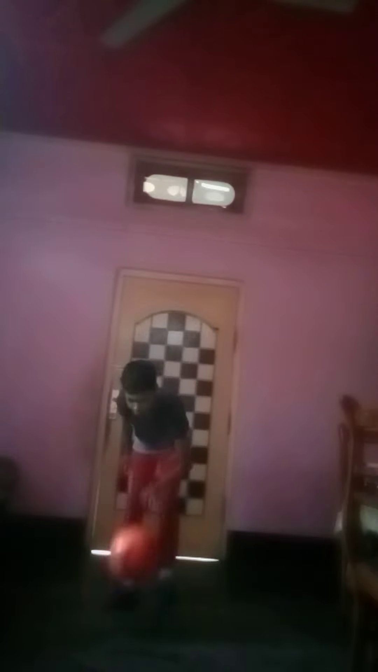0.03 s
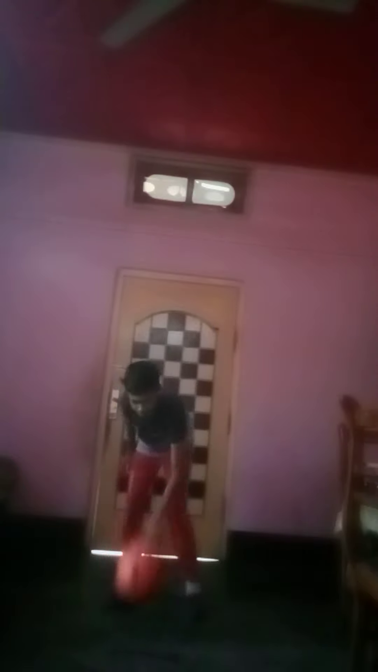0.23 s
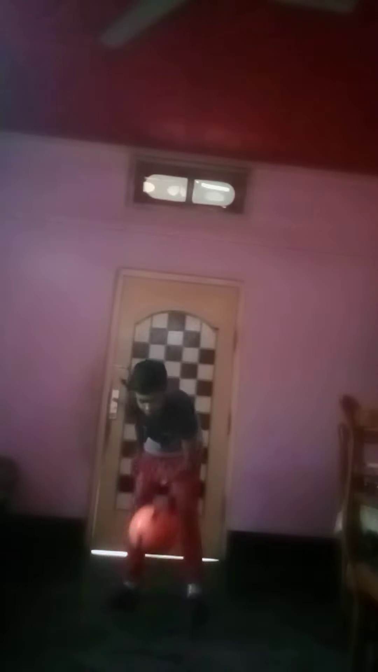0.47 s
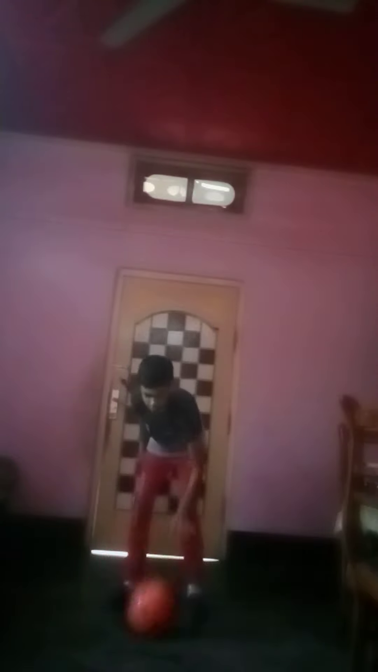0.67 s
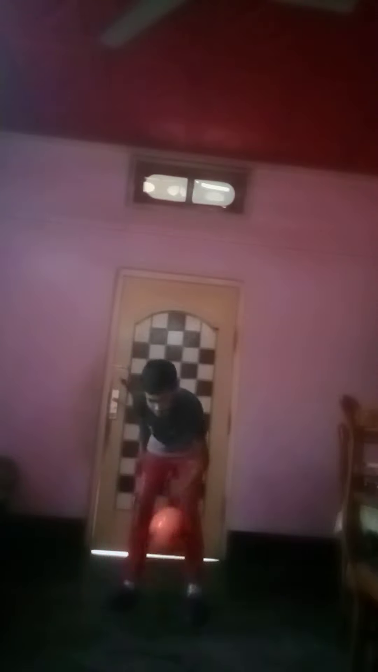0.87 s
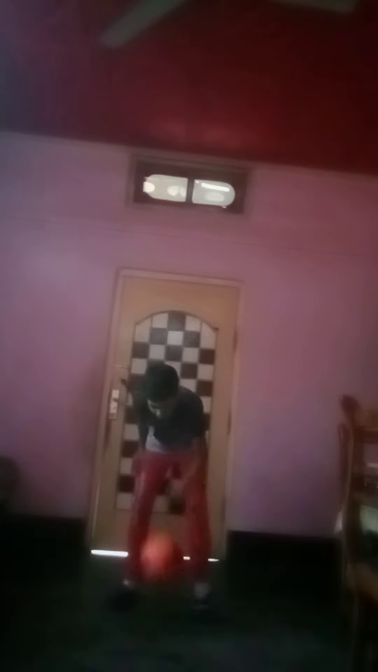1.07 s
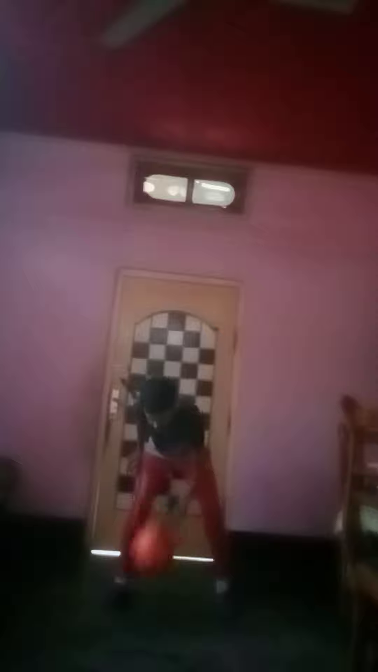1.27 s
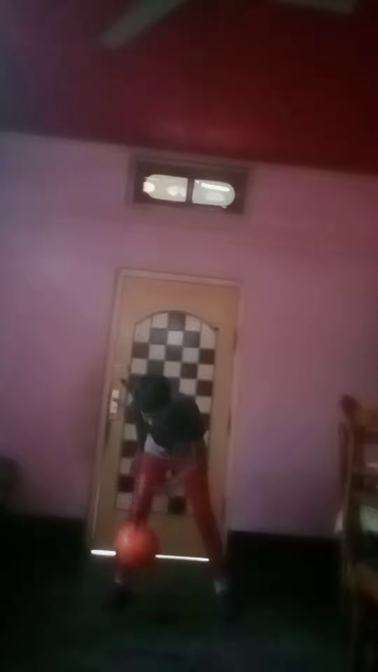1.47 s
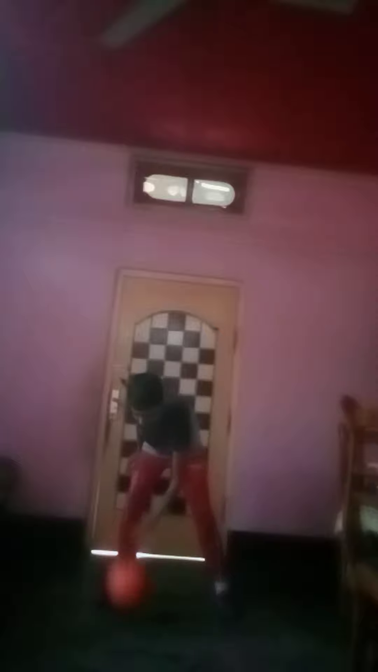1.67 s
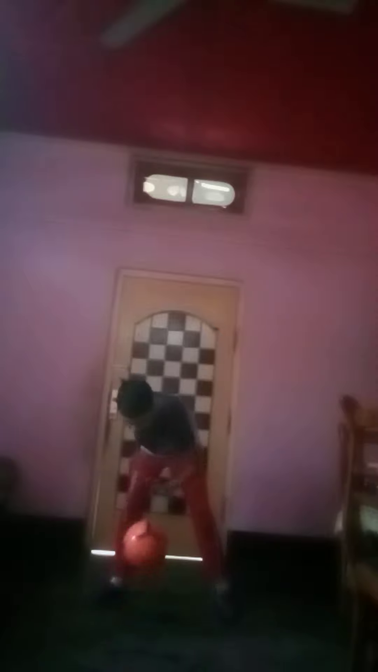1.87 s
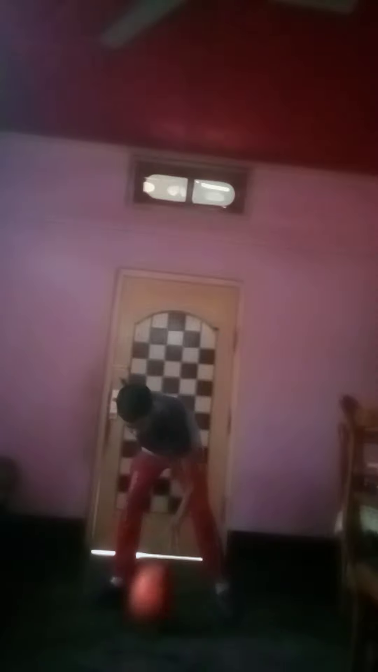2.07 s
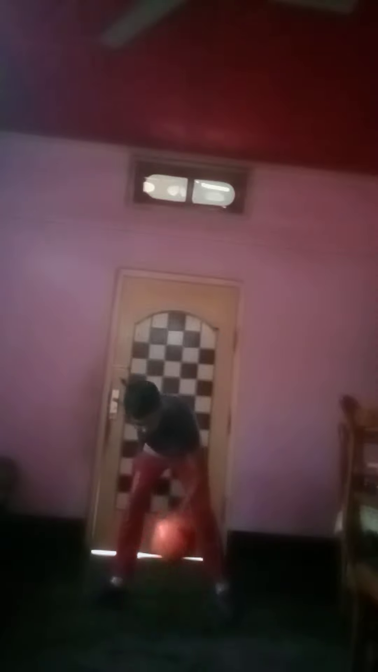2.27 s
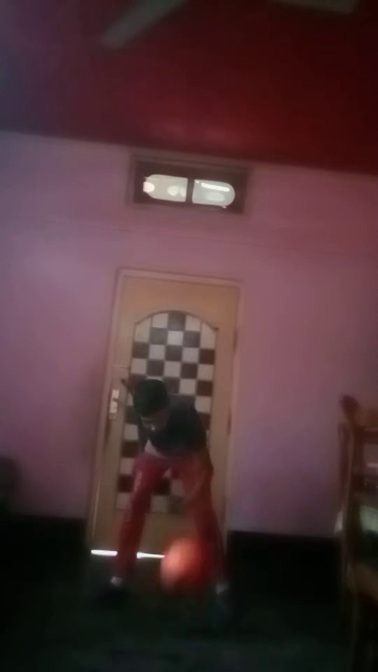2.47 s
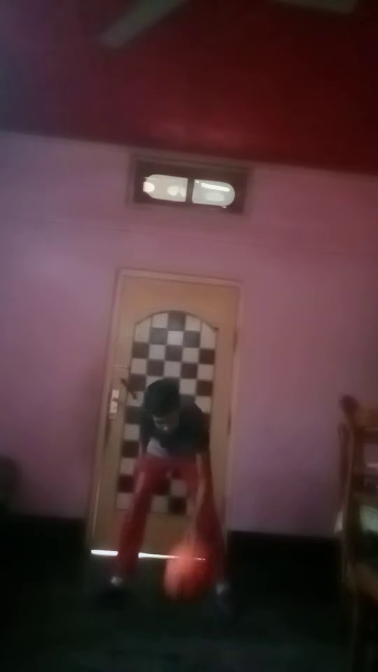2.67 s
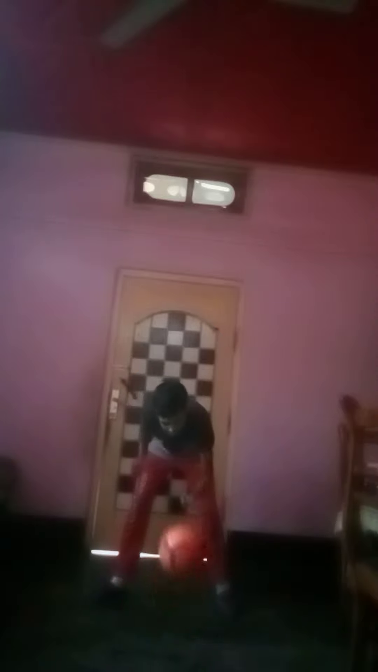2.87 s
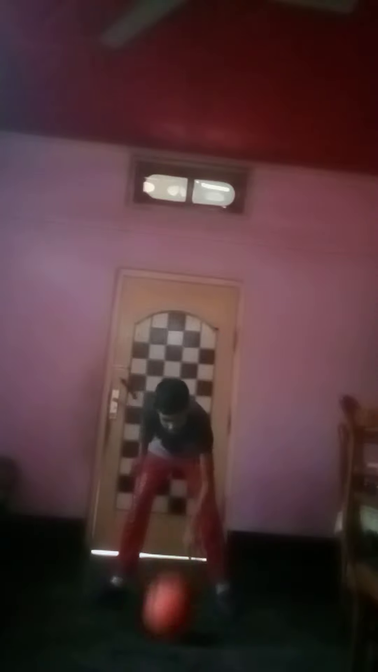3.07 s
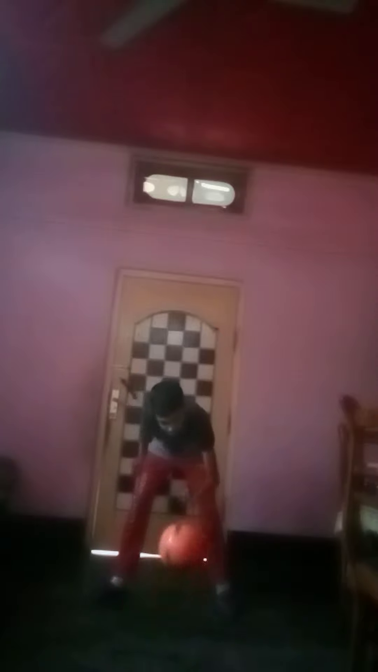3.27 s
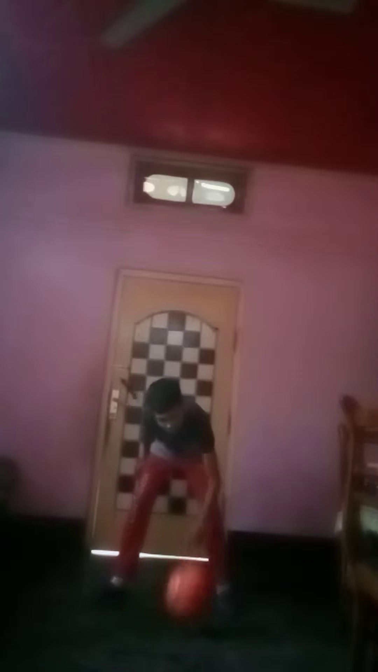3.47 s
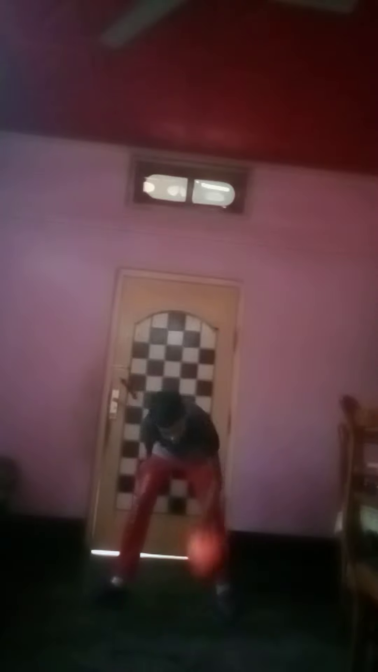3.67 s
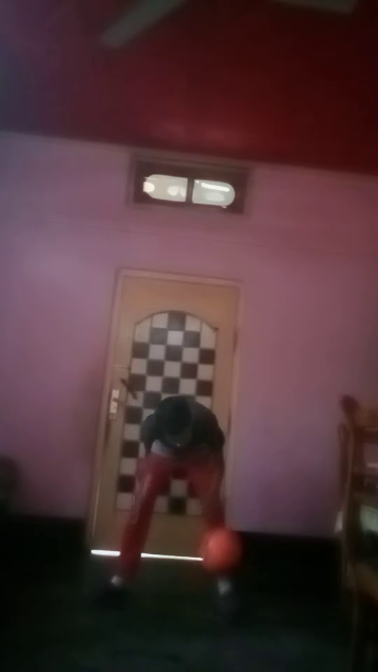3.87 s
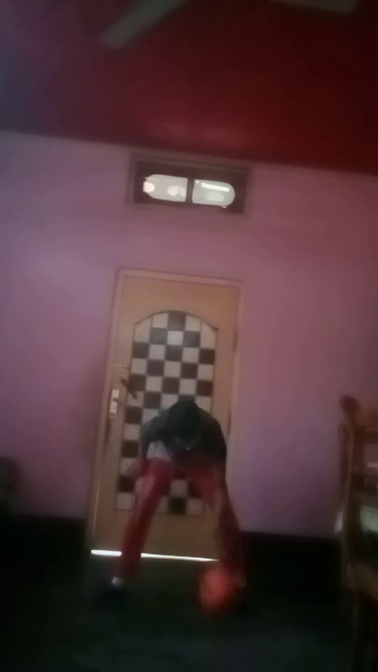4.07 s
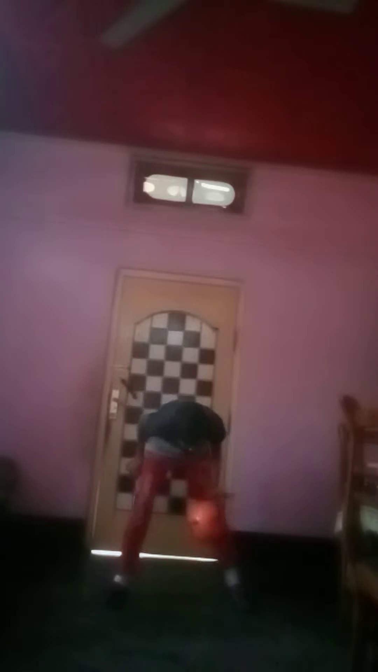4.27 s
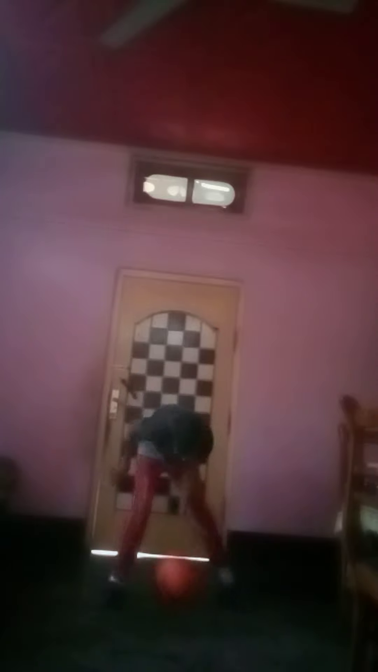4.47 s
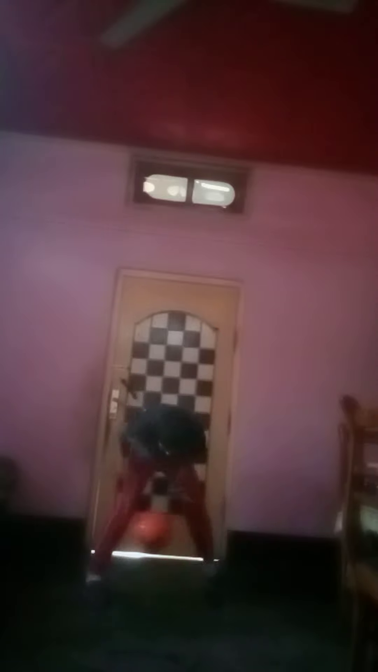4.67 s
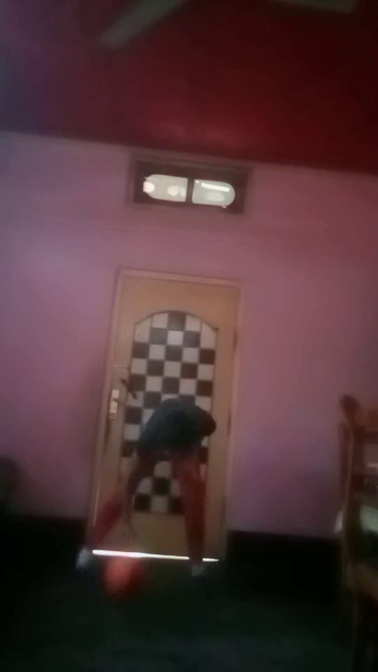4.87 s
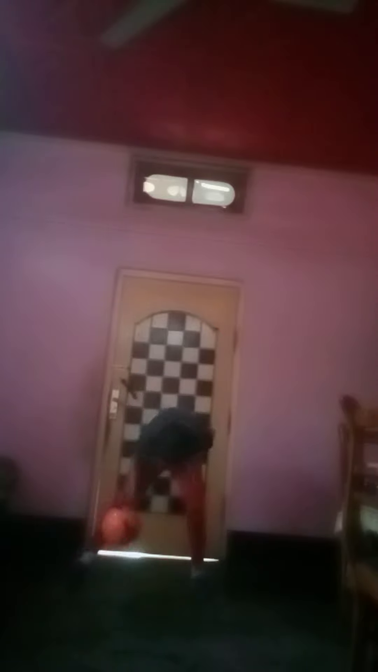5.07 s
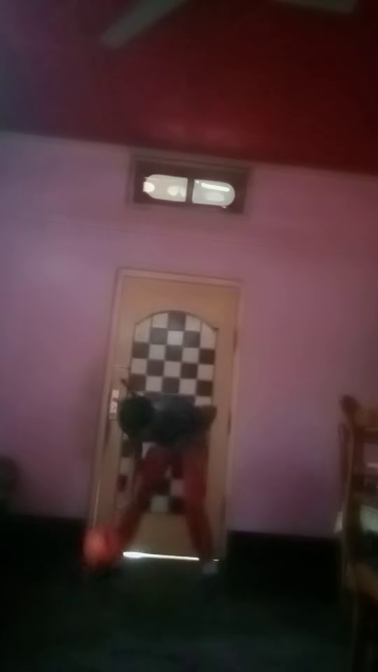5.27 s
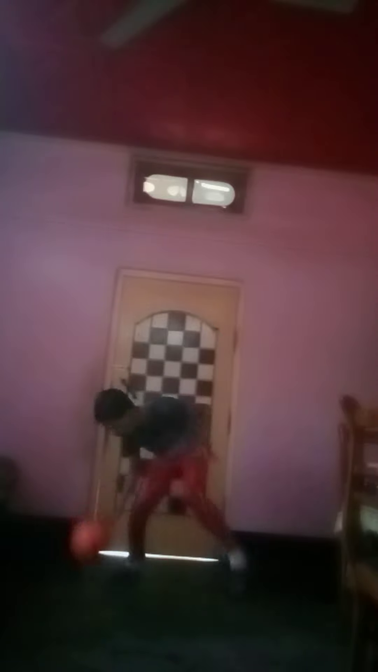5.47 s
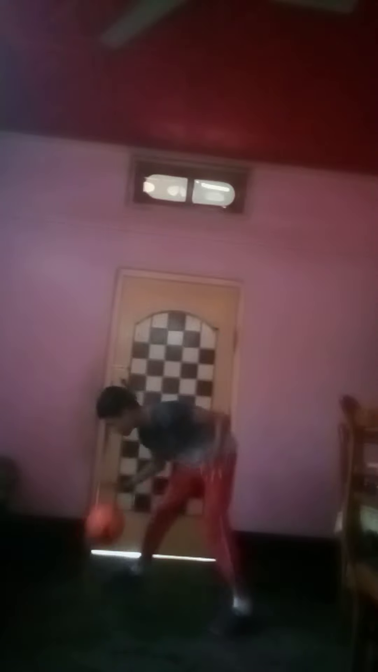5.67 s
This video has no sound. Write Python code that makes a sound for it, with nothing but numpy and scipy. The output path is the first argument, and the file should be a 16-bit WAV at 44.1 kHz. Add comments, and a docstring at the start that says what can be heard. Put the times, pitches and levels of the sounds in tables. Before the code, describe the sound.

A single rubber ball is dribbled on a hard floor in a small bare room. Sharp cracks with low thumps come about three times a second, loudest at the start. Between most of them a hand pats the ball with a blunter, hollow sound. Short, boomy echo follows every hit. Faint shoe pats and cloth swishes appear, over a quiet hush, heard by a phone a few metres away.

```python
"""A small, bare room with a hard floor: a rubber ball is dribbled a few metres from a phone.
Each bounce is a sharp crack on a low thump: a short pulse drives damped body rings and the air inside the ball.
Between bounces a hand meets the ball with a blunter, hollower pat: smeared contacts over a soft push.
The walls answer with a dense noise echo and booming, decaying sine modes.
Shoes pat faintly, trousers swish in noise swells, and a steady hush lies underneath."""
import sys
import numpy as np
from scipy import signal
from scipy.fft import rfft, irfft, next_fast_len
from scipy.io import wavfile

SR = 44100
rng = np.random.default_rng(int(sys.argv[2]) if len(sys.argv) > 2 else 0)


def wrap_up_sound(samples):
    """Save the sound to the file named by the first command line argument, as 16-bit audio."""
    columns = np.atleast_2d(samples).T
    # keep every value between -1 and 1, then stretch to whole-number steps
    tamed = np.clip(columns, -1, 1)
    steps = np.round(tamed * 32767).astype(np.int16)
    wavfile.write(sys.argv[1], SR, steps)


N = 252693

# Floor bounces: (time [s], level [dB], thud [Hz], knock [Hz], smack [Hz], brightness [dB])
BOUNCES = [(0.0019, 6.5, 251, 947, 3400, -1), (0.3585, 5.5, 385, 695, 2630, -1.5),
           (0.739, 0.9, 400, 748, 3460, -2.5), (1.065, 2, 435, 610, 1550, 2.5),
           (1.4122, 1.5, 252, 628, 1735, 2), (1.7627, -0.5, 252, 570, 1360, 0),
           (2.1166, 1, 478, 500, 1300, 0.5), (2.45, 0.44, 334, 620, 1330, -1),
           (2.798, 1, 220, 807, 3300, 2), (3.1561, 1.3, 170, 730, 1830, -5),
           (3.507, 1.5, 393, 814, 1980, -3.5), (3.8177, -1.5, 228, 872, 1270, -1.5),
           (4.139, 3, 292, 790, 2180, 1), (4.5185, -3, 321, 570, 1370, 1.5),
           (4.9249, 1.16, 493, 752, 2920, 0.5), (5.261, -3.5, 318, 793, 1290, -1),
           (5.5951, -1, 209, 863, 1420, 4)]
# Hand pats, levels relative to each other: (time [s], level [dB], thud [Hz], thump [dB])
HAND_PATS = [(0.237, 12, 128, -0.5), (0.615, 12.5, 127.4, -6.5), (0.9643, -13, 127.8, -2),
             (1.2967, 3.5, 297, 1.5), (1.661, 8.5, 178, 3.5), (2.0219, 11.5, 376, -1),
             (2.339, 2.5, 424, -9), (2.6893, 2, 128, 0.5), (3.038, 8.5, 202, -4), (3.401, 8.5, 428, 0.5),
             (4.729, -6, 314, -20), (4.845, -5, 135, -2), (5.158, -10, 143.4, -4), (5.4969, -2, 204, 8.5)]
# Soft footfalls: (time [s], level [dB])
FOOTFALLS = [(1.019, -10), (3.722, -8.5), (3.76, -7.5), (4.085, -4.5), (4.367, -10.5)]
# Trouser swishes: (time [s], half length [s], level [dB])
SWISHES = [(1.246, 0.051, -66.5), (4.047, 0.032, -67), (4.37, 0.073, -65.5), (4.641, 0.046, -61),
           (4.8, 0.11, -72.5), (5.373, 0.061, -63.5)]

# Spectrum of the ball hitting the floor, before each bounce's tone: (frequency [Hz], level [dB])
FLOOR_HIT = [(25, -36), (45, 1.5), (62, 3.5), (140, 3), (250, 0), (400, -3.5), (560, -8.5), (790, -9),
             (1100, -16), (2000, -17.5), (3800, -24.5), (6500, -24.5), (16000, -35.5)]
# Spectrum of the hand on the ball, before each pat's tone: (frequency [Hz], level [dB])
PALM_HIT = [(25, -20), (48, -18), (90, 6), (150, 2), (330, 0), (560, -7.5), (790, -5.5), (1200, -13.5),
            (2600, -21.5), (4000, -31), (6500, -35.5), (16000, -43)]
# Spectrum of a shoe sole on the floor: (frequency [Hz], level [dB])
SOLE = [(25, -32), (100, -17), (250, -21.5), (800, -16), (2000, -35), (16000, -55)]
# Spectrum of rubbing cloth: (frequency [Hz], level [dB])
CLOTH = [(200, 15), (800, 6), (2000, 8.5), (3500, 2), (6500, -1), (16000, -12)]
# Spectrum of the room's hush: (frequency [Hz], level [dB])
HUSH = [(20, 1.5), (70, 2.5), (250, 2.5), (800, -4.5), (2000, -7.5), (6000, -29.5), (16000, -19)]
# Treble response of the phone: (frequency [Hz], gain [dB])
PHONE = [(6800, -2), (8000, -12), (10000, -10.5), (13500, -17.5), (14300, -10.5), (15300, -3), (15800, -8),
         (16100, -28)]

# Air ringing inside the ball, base levels: (frequency [Hz], level [dB], t60 [s])
BALL_AIR = [(705, -67, .6), (797, -61, .12), (1272, -69, .55), (1520, -73, .6), (1762, -68, .8),
            (2060, -66, .8)]
# Standing waves of the room, base levels: (frequency [Hz], level [dB])
ROOM_MODES = [(64, -54.5), (76, -52), (94, -58.5), (123, -49.5), (139, -49.5), (182, -50.5), (216, -70),
              (243, -49.5), (320, -49.5), (436, -50)]
# Strongest early reflections, nominal delays: (delay [s], gain [linear])
WALLS = [(.0052, 0.19), (.0097, 0.75), (0.015, 0.36), (.0195, 0.16), (0.024, 0.15)]
# Decay time of the room: (frequency [Hz], t60 [s])
ROOM_T60 = [(100, 0.34), (400, 0.29), (1000, 0.36), (2500, 0.34), (6000, 0.35), (15000, 0.28)]
# Colour of the dense echo: (frequency [Hz], level [dB])
DIFFUSE = [(40, -12), (120, -4.5), (260, 0), (700, 2.5), (6000, 1), (16000, 2.5)]

# Centres of the thump, body, knock, smack and crack bands: (frequency [Hz])
BAND_HZ = [140, 400, 850, 1900, 4700]
# The next four tables each hold one value for thump, knock, smack and crack.
# Tone of an ordinary bounce: (gain [dB])
BOUNCE_TONE_DB = [-1, 1.32, 0.04, -2]
# How much of a bounce's brightness each band takes: (share [dB per dB])
BRIGHTNESS_SHARE = [0, 0.2, 0.8, 1.1]
# Base tone of a hand pat: (gain [dB])
HAND_TONE_DB = [-2.5, -2.76, -2.3, 3]
# Light touches are fingertips, firm ones the fleshy palm: (shift [dB per dB of level])
PALM_SHIFT = [-0.22, -0.16, -0.49, -0.24]

LENGTH = 20480  # samples in every pulse and response
AGE = np.arange(LENGTH) / SR  # seconds since onset
FREQS = np.fft.rfftfreq(LENGTH, 1 / SR)

# A knock near the ring of the air inside is louder
KNOCK_BEST_HZ, KNOCK_WIDTH_HZ, KNOCK_BOOST_DB = 838, 36, 4.5
SMACK_GROWTH = 0.35  # dB per dB of level: a hard bounce smacks out of proportion
THUD_SHARE, BASS_SHARE = 0.66, 0.75  # dB of thud and of bass per dB of thump
GLANCE_STRETCH = 0.24  # dB of contact time per dB of thump lost: a glancing hand slides longer
TOUCH_T60_S, TOUCH_RISE_S = 0.014, 0.0007  # contact at 0 dB thump
FINGERS_DB, PALM_LAG_S = -4.5, 0.004  # the fingers land first, the palm just after


def amp(db):
    """Decibels to gain."""
    return 10 ** (np.asarray(db) / 20)


def along(points, hz):
    """(frequency, value) points read on a log-frequency axis."""
    f, v = np.transpose(points)
    return np.interp(np.log(hz + 1), np.log(f + 1), v)


def fade(t60):
    """An exponential decay that loses 60 dB in t60 seconds."""
    return np.exp(-np.log(1000) * AGE / t60)


def pulse(db):
    """The tightest causal (minimum-phase) pulse with this spectrum, by folding its cepstrum."""
    cepstrum = irfft(np.log(amp(db)))
    cepstrum[1:LENGTH // 2] *= 2
    cepstrum[LENGTH // 2 + 1:] = 0
    return irfft(np.exp(rfft(cepstrum)))


def through(x, response):
    """x convolved with a response, at its own length."""
    return signal.fftconvolve(x, response)[:len(x)]


def add(track, s, sound):
    """Mix a sound into the track at time s."""
    start = max(0, round(s * SR))
    track[start:start + len(sound)] += sound[:N - start]


def noise(spectrum):
    """Steady coloured noise of rms 1."""
    white = rng.standard_normal(N + LENGTH)
    x = signal.fftconvolve(white, pulse(along(spectrum, FREQS)), "valid")[:N]
    return x / x.std()


def hush():
    """The steady coloured noise of the quiet room."""
    return amp(-73.5) * noise(HUSH)


def resonance(hz, db, t60):
    """A damped ring: a cosine dying away exponentially."""
    return amp(db) * np.cos(2 * np.pi * hz * AGE) * fade(t60)


def contact(spectrum, tone, body, ring_db):
    """One blow on the ball: a pressure pulse that drives its body and sets the air inside ringing."""
    thump, knock, smack, crack = tone
    tilt = along(list(zip(BAND_HZ, [thump, 0, knock, smack, crack])), FREQS)
    air = np.zeros(LENGTH)
    for hz, db, t60 in BALL_AIR:
        air += resonance(hz, db + ring_db + rng.normal(0, 0.89), t60)
    blow = pulse(along(spectrum, FREQS) + tilt)
    return blow + through(blow, body + air)


def room_tail(gap, build=0.0035):
    """Dense echo of energy 1 before colouring: noise dying at each frequency's own rate."""
    hz, t, z = signal.stft(rng.standard_normal(LENGTH), SR, nperseg=256)
    decay = np.exp(-np.log(1000) * t / along(ROOM_T60, hz)[:, None])
    tail = signal.istft(z * decay, SR, nperseg=256)[1][:LENGTH]
    tail *= 0.65 + 0.37 * np.tanh((AGE - gap) / build)  # swells once the walls are reached
    return through(tail / np.linalg.norm(tail), pulse(along(DIFFUSE, FREQS)))


def room(direct, echo_db, modes_db, gap):
    """One blow's way to the phone: direct sound, wall copies, dense echo, standing waves."""
    path = direct + amp(echo_db) * room_tail(gap)
    for delay, gain in WALLS:  # the delays shift as the player moves
        shifted_delay = abs(delay + rng.normal(0, 0.0006))
        path += gain * np.roll(direct, int(shifted_delay * SR))
    for hz, db in ROOM_MODES:  # each spot feeds the modes differently
        wave = np.sin(2 * np.pi * (hz * AGE + rng.random()))
        path += amp(db + modes_db + rng.normal(0, 0.61)) * wave * fade(along(ROOM_T60, hz))
    return path


def bounces():
    """The ball smacks the floor, squashes and swings back with a thud and a knock."""
    track = np.zeros(N)
    for s, db, thud_hz, knock_hz, smack_hz, bright_db in BOUNCES:
        tone = np.array(BOUNCE_TONE_DB) + bright_db * np.array(BRIGHTNESS_SHARE)
        tone[1] += KNOCK_BOOST_DB * np.exp(-((knock_hz - KNOCK_BEST_HZ) / KNOCK_WIDTH_HZ) ** 2)
        body = resonance(136, db=-55, t60=0.016)
        body += resonance(thud_hz, db=-45.5, t60=0.095)
        body += resonance(knock_hz, db=-38, t60=0.034)
        body += amp(SMACK_GROWTH * db) * resonance(smack_hz, db=-25, t60=0.0045)
        blow = -contact(FLOOR_HIT, tone, body, ring_db=-1.5)
        path = room(signal.unit_impulse(LENGTH), echo_db=6.0, modes_db=1.5, gap=0.01)
        add(track, s, amp(db) * through(blow, path))
    return track


def soft_touch(t60, rise=0.00035, split_hz=450):
    """A yielding surface lands: one blunt low push under a high smear of tiny contacts."""
    smear = rng.standard_normal(LENGTH) * fade(t60) * (1 - np.exp(-AGE / rise))
    smear /= np.linalg.norm(smear)
    contacts = signal.lfilter(*signal.butter(2, split_hz, "high", fs=SR), smear)
    push = signal.lfilter(*signal.butter(2, split_hz, fs=SR), signal.unit_impulse(LENGTH))
    return push + contacts


def hands(level_db=-10.0):
    """Palm and fingers pat the ball, blunter than a bounce and with a hollower thud."""
    track = np.zeros(N)
    for s, db, thud_hz, thump_db in HAND_PATS:
        tone = np.array(HAND_TONE_DB) + db * np.array(PALM_SHIFT)
        tone[0] += BASS_SHARE * thump_db  # a square hit thumps, a glancing one hardly does
        body = resonance(146, db=-44.0, t60=0.08)
        body += resonance(762, db=-46.5, t60=0.048)
        body += amp(THUD_SHARE * thump_db) * resonance(thud_hz, db=-41.5, t60=0.083)
        blow = -contact(PALM_HIT, tone, body, ring_db=2.5)
        slide = amp(-GLANCE_STRETCH * thump_db)
        fingers = soft_touch(t60=TOUCH_T60_S * slide, rise=TOUCH_RISE_S * slide)
        palm = soft_touch(t60=TOUCH_T60_S * slide, rise=TOUCH_RISE_S * slide)
        touch = amp(FINGERS_DB) * fingers + np.roll(palm, int(PALM_LAG_S * SR))
        path = room(touch, echo_db=9.5, modes_db=1, gap=0.012)
        add(track, s, amp(db + level_db) * through(blow, path))
    return track


def steps():
    """Soft soles pat the floor as the player shifts weight."""
    track = np.zeros(N)
    for s, db in FOOTFALLS:
        path = room(soft_touch(t60=0.089), echo_db=-1.5, modes_db=8, gap=0.015)
        add(track, s, amp(db) * through(pulse(along(SOLE, FREQS)), path))
    return track


def trousers():
    """Cloth rubs in short bell-shaped swells of noise as the legs move."""
    t = np.arange(N) / SR
    swell = np.zeros(N)
    for s, half, db in SWISHES:
        swell += amp(db) * np.exp(-((t - s) / half) ** 2 / 2)
    return swell * noise(CLOTH)


def scene():
    """The dribble and the player's movements over the hush of the room."""
    mix = hush() + bounces() + hands() + steps() + trousers()
    return mix[None]


def record(dry):
    """The phone dulls the top octave, peaks near its upper edge and keeps nothing above."""
    top_hz = 16400
    coloured = through(dry[0], pulse(along(PHONE, FREQS)))
    size = next_fast_len(N + LENGTH)
    kept = np.fft.rfftfreq(size, 1 / SR) < top_hz
    return irfft(rfft(coloured, size) * kept, size)[None, :N]


dry = scene()
out = record(dry)
wrap_up_sound(out)
```